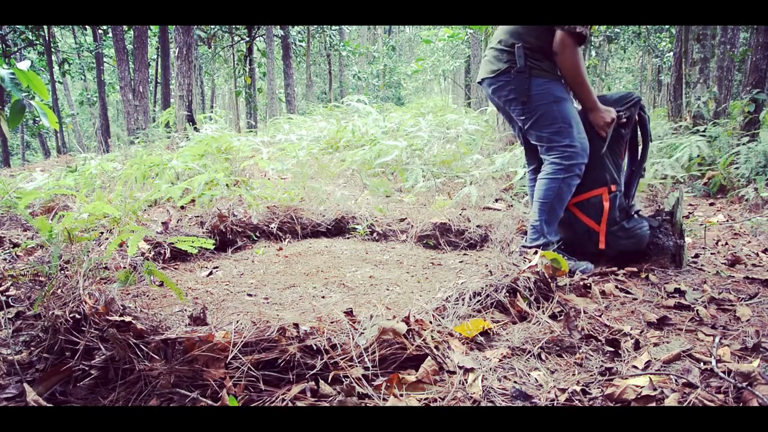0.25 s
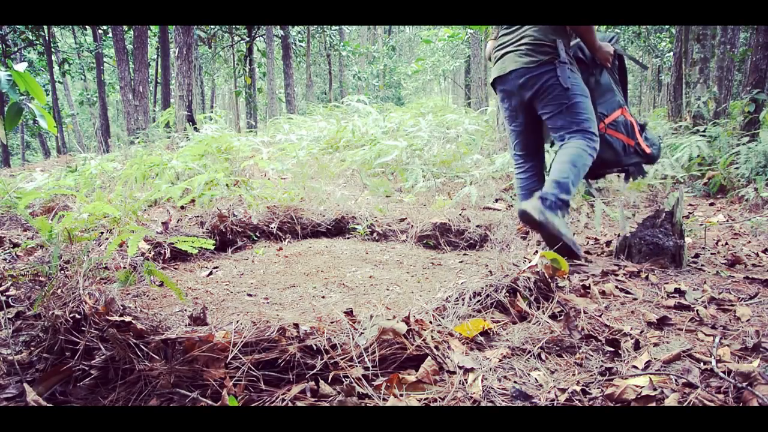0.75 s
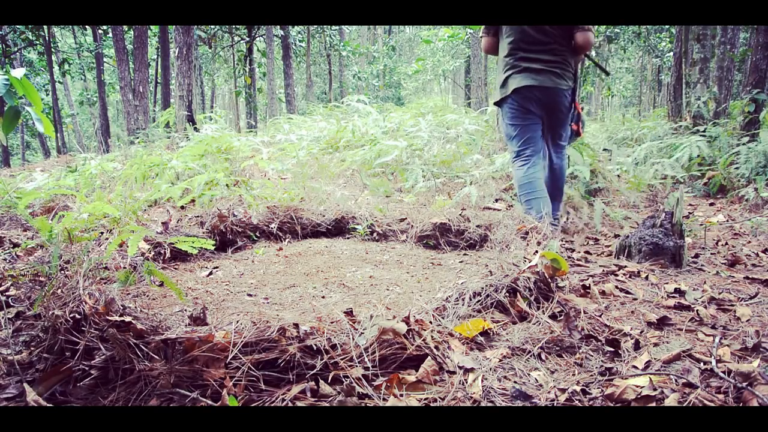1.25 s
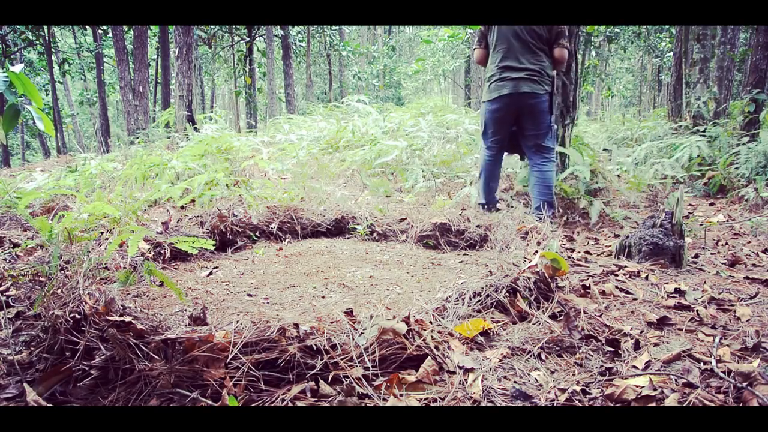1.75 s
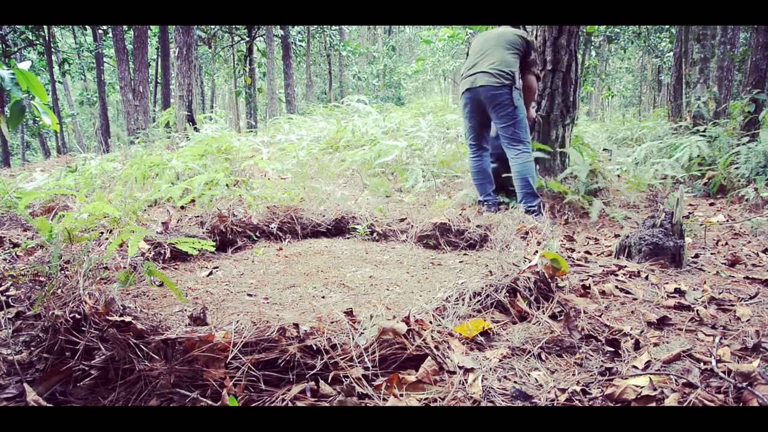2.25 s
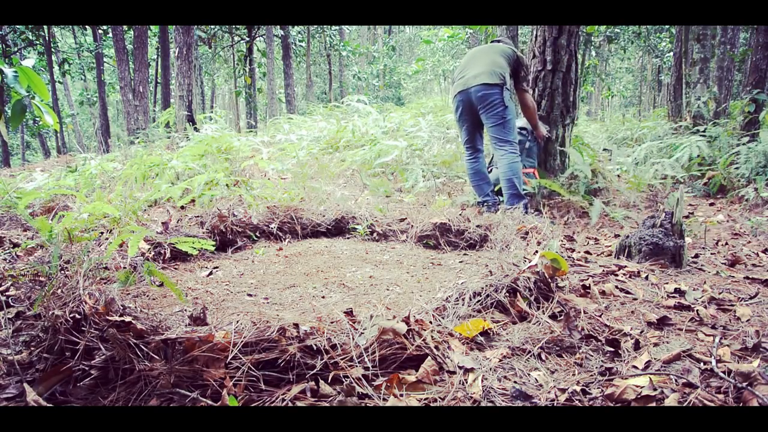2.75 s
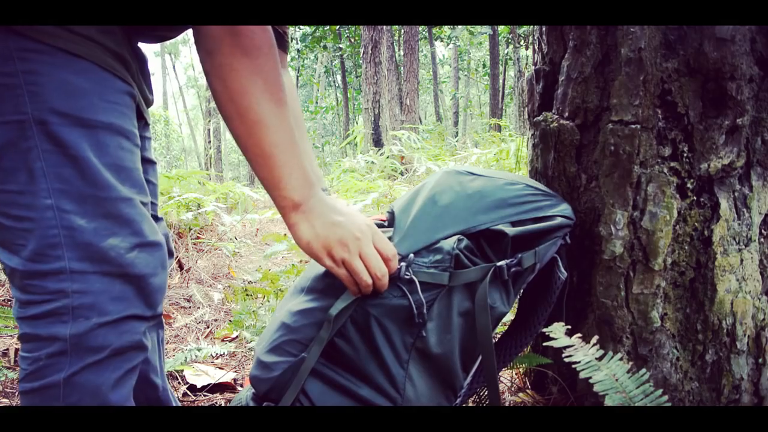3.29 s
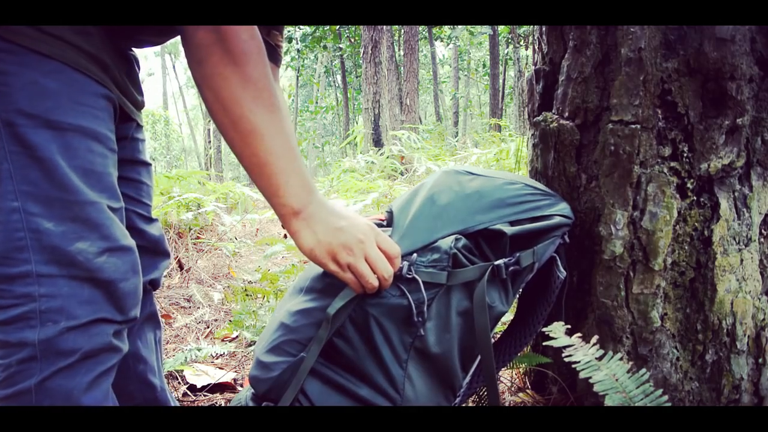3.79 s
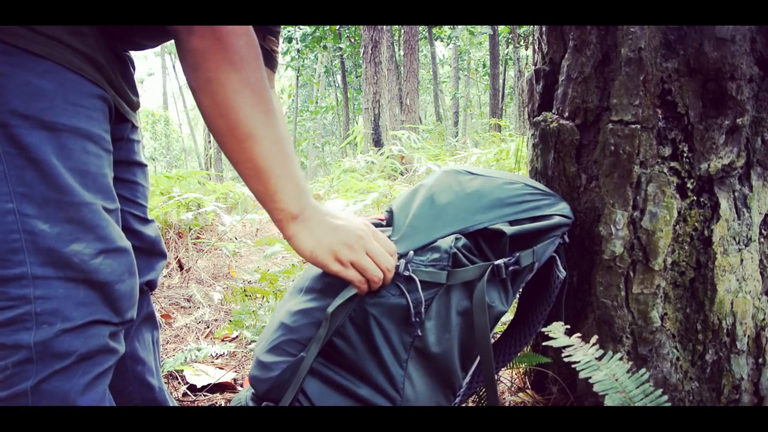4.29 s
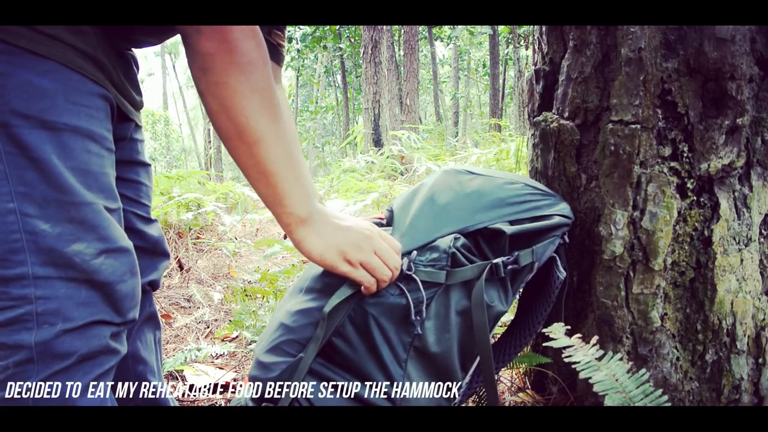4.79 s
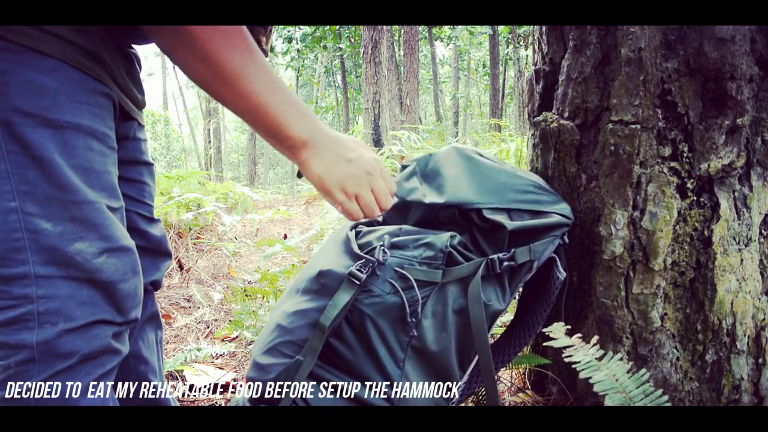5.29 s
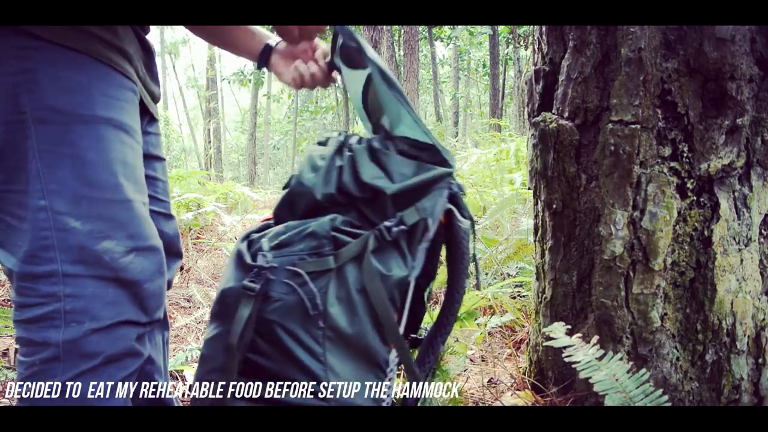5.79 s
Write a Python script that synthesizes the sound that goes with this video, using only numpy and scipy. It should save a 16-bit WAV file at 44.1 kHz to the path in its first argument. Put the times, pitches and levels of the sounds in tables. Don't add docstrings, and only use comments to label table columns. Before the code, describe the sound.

Outdoor stereo pickup among trees: a continuous high cicada hiss with needle-thin insect tones, one growing strong in the second half and leaning left. Light scuffs and crackling leaf litter come first, with a faint bee hum. After a pause, a small strap tick, a crisp buckle click, then quick tugs, creases and a dull flap of a nylon backpack lid, heard close and dry.

```python
import sys
import numpy as np
from scipy import signal
from scipy.fft import rfft, irfft
from scipy.io import wavfile

SR = 44100
rng = np.random.default_rng(int(sys.argv[2]) if len(sys.argv) > 2 else 0)


def generate_wav(sig):
    pcm = np.round(np.clip(np.atleast_2d(sig).T, -1, 1) * 32767).astype(np.int16)
    wavfile.write(sys.argv[1], SR, pcm)


def convert_level_to_amplitude(level_db):
    exponent = np.asarray(level_db, float) / 20
    return 10 ** exponent


N = 266352

# peak_s, length_s, level_db, weight_db, brightness_db
BOOT_STROKES = [(.2, 0.34, -50.5, -5, -3), (.295, 0.16, -42, -5, -9), (.382, 0.028, -45, -14, -6),
                (.64, 0.11, -47.5, -9, -3.5), (.89, 0.16, -51, -11, -14), (1.18, 0.062, -48, 1.5, 0),
                (1.26, 0.084, -43, -2.5, 2.5), (1.35, 0.12, -45, -5, -8), (1.215, .05, -45.5, -5, 1),
                (1.395, 0.038, -42, -7.5, -1), (1.43, 0.043, -46.5, -3, -1.5),
                (1.53, 0.094, -47, -4.5, -1.5), (1.57, 0.045, -58.5, 10, -6), (1.63, 0.037, -45, -1, 5),
                (1.655, .04, -44.5, -3, 0), (.325, 0.029, -40.5, -6, -11), (2.2, .1, -65, .1, -8),
                (1.68, 0.063, -45.5, -6, 7.5), (1.715, 0.044, -37.5, -12.5, -0.5), (1.74, .03, -42, -7, -3),
                (1.9, 0.86, -53, -3.5, 1), (2.32, 0.11, -52, -2.5, 5.5), (2.55, .2, -57.5, 0, -1.5),
                (2.72, 0.35, -48.5, -3.5, 1.2), (2.92, 0.44, -47.5, -3.5, 1.5)]
# peak_s, length_s, level_db, weight_db, brightness_db
LID_PULLS = [
    (5.48, .11, -51.5, 0.5, 2),
    (5.56, 0.073, -45.5, -7, -2),
    (5.645, 0.043, -41.5, -8, -1),
    (5.77, 0.091, -43, -4, -3),
    (5.7, .05, -48.5, 0, -2),
    (5.86, 0.18, -47, 0.5, -0.5),
    (5.935, 0.028, -36.5, -8, 0),
    (5.99, 0.13, -45.5, -4, -2),
]
# start_s, end_s, level_db
SOFT_GROUND = [
    (0, .4, -55),
    (1.2, 2.9, -57.5),
    (5.6, 6.04, -55.5),
]
# start_s, peak_db, body_hz, t60_s, crack_db
KNOCKS = [(1.2616, -33, 524, 0.029, -40), (1.452, -35, 895, 0.0093, -38), (1.526, -34.5, 895, 0.0092, -37),
          (1.56, -31, 690, 0.03, -47), (1.57, -31.5, 920, 0.033, -44), (1.581, -32, 740, 0.037, -46),
          (1.593, -35, 600, 0.027, -44), (1.62, -33, 930, .015, -40), (1.63, -40, 990, .02, -28),
          (1.638, -30, 750, .025, -47), (1.646, -33, 1000, .02, -47), (1.587, -37, 950, .025, -47),
          (1.662, -37, 1000, .02, -43), (.233, -33, 650, 0.018, -50), (0.328, -34, 557, .02, -50),
          (5.7932, -23, 1930, 0.0099, -44), (5.7938, -31, 620, 0.011, -50), (5.904, -37, 350, 0.035, -50),
          (5.814, -30.5, 900, 0.0089, -41)]
# pitch_hz, level_db, t60_s
BUCKLE_MODES = [(270, -27, 0.029), (385, -25, .018), (520, -19, 0.015), (736, -21, 0.012), (980, -25, 0.01),
                (2090, -22, 0.0057), (2900, -24, 0.0046), (3580, -18, 0.0072), (4500, -24, 0.004),
                (8460, -17, 0.0051)]
# pitch_hz, level_db, t60_s
STRAP_MODES = [(315, -25, .017), (480, -34, .012), (650, -22, .018), (1060, -40, 0.024)]
# pitch_hz, level_db, t60_s
LID_MODES = [(128, -31, .06), (235, -27, 0.036), (1000, -39, .015)]
# pitch_hz, level_db, t60_s
CORD_LOCK_MODES = [(620, -42, .015), (950, -29, .022), (2580, -29, 0.013)]
# start_s, peak_db, lowest_hz, highest_hz
SNAPS = [(1.2625, -27, 1500, 9000), (1.6215, -20, 3000, 9000), (1.7445, -19, 4500, 10000),
         (1.775, -33, 5000, 12000), (1.9203, -24.5, 2000, 11000), (2.698, -31, 1000, 3200),
         (2.7543, -25, 3500, 13000), (2.761, -26, 3000, 12000), (2.905, -34, 2500, 6000),
         (3.0292, -36, 1500, 4000), (5.22, -33, 3000, 9000), (5.4582, -25, 6000, 11500),
         (5.5555, -33, 3800, 6000), (5.5668, -23, 1000, 4500), (5.7932, -19, 696, 2800),
         (5.6535, -26, 1500, 3200), (5.814, -28, 600, 3000), (5.925, -34, 1500, 5000),
         (5.935, -24, 3200, 7000), (5.945, -30, 1200, 5000), (5.645, -27, 1500, 4500),
         (5.76, -28, 1500, 4000), (.32, -28, 3000, 5000), (.33, -25, 3000, 4760), (1.678, -28, 7000, 13000),
         (1.719, -24, 3000, 8000), (1.728, -26, 3500, 5500), (1.4, -26, 2000, 9000)]
# time_s, left_db, right_db, path_difference_cycles
NEAR_LEVELS = [
    [(0, -37, -37, 0.27), (.08, -33, -42, .9), (.104, -46, -48, .7), (.16, -43, -40, -0.00032),
     (.296, -44, -50, -0.61)],
    [(1.4, -43, -51, 0.15), (1.432, -33.5, -41, 0.16), (1.62, -36, -28.5, 0.22), (1.712, -28.5, -36, 0.22),
     (1.93, -34, -40, 0.35), (2.1, -33, -45, -0.99), (2.344, -31, -36, -0.34), (2.49, -32, -32, -1.15),
     (2.552, -52, -48, -1.1)],
    [(3.93, -46, -60, 1.1), (3.98, -32.5, -35, 0.28), (4.08, -23.5, -27, 1.4), (4.25, -24.5, -28.5, 0.093),
     (4.61, -26, -34.5, -0.44), (5.1, -19, -30, -0.26), (5.32, -22.5, -33.5, -0.73),
     (5.52, -23, -28.5, -0.59), (6.04, -22, -31.5, -0.33)],
]
NEAR_STROKES = [324, 326, 348]
# start_s, pitch_hz, climb_hz
NEAR_NOTES = [
    (-.62, 12076, 80),
    (1.4, 12057, 82),
    (3.93, 12020, 121),
]
STROKE_CLUSTERS = [-53, -52, -49.5]
# time_s, half_width_s, left_loss_db, right_loss_db
ECHO_DIPS = [(1.544, 0.054, 18, 11), (1.832, 0.092, 17, -2), (1.992, 0.12, 22, 13), (2.152, 0.044, 17, 9),
             (2.256, 0.052, 4, -2), (2.448, 0.053, 12, 6), (4.042, 0.019, 19, -1), (4.085, 0.091, -1, 19),
             (4.18, 0.071, 8, 0.5), (4.284, 0.033, 19, 1), (4.498, 0.095, 6, -4.5), (4.61, 0.046, -1.5, 6),
             (4.69, 0.084, 6, -2), (4.754, .03, 12, 6), (4.778, 0.069, 0.5, 1), (4.842, 0.059, 11.5, -2),
             (4.922, 0.093, 5, 4), (5.002, 0.057, 11, -3), (5.05, 0.095, 3, 7), (5.394, 0.078, 9, -3),
             (5.64, 0.042, 9, 1), (5.682, 0.062, -3.5, 2), (4.318, .03, 5, 3), (4.14, .025, 3, 2),
             (4.375, 0.021, 4, 9), (4.565, 0.032, 1, 2.5), (4.65, 0.026, 6, -1), (5.25, 0.073, 5.5, 6),
             (5.49, 0.019, 5, 3), (5.75, 0.13, 4, 6), (5.86, 0.027, 4, 0), (5.93, 0.043, 5, 3)]
# start_s, end_s, level_db
FIRST_SPELLS = [(0, .04, -56), (.07, .1, -52), (.15, .2, -55), (1.4, 1.5, -48), (1.55, 1.62, -50),
                (1.72, 1.76, -53), (1.83, 1.92, -48.5), (1.95, 2.03, -52), (2.2, 2.3, -50.5),
                (2.4, 2.49, -48), (3.97, 4.3, -45), (4.3, 4.5, -48), (4.5, 4.63, -51), (5.02, 5.2, -57),
                (5.24, 5.28, -54), (5.3, 5.47, -48), (5.5, 5.6, -44.5), (5.62, 6.04, -46.5)]
# start_s, end_s, level_db
SECOND_SPELLS = [(0, .03, -48), (1.6, 1.72, -48), (4.4, 4.7, -55), (4.9, 6.04, -48)]
# start_s, end_s, level_db
THIRD_SPELLS = [(0, .17, -48), (1.88, 1.95, -50.5), (2.0, 2.12, -56), (2.2, 2.53, -47), (3.97, 4.05, -52),
                (4.15, 4.26, -54), (4.33, 4.5, -50.5), (4.55, 4.75, -54), (4.85, 5.12, -56.5),
                (5.2, 5.42, -57)]
# start_s, end_s, level_db
SIDEBAND_SPELLS = [(0, .2, -49), (1.5, 1.7, -52), (1.8, 1.95, -46), (2.05, 2.33, -44.5), (3.97, 4.03, -51),
                   (4.07, 4.13, -48), (4.19, 4.26, -45), (4.35, 4.53, -45), (4.58, 4.7, -51),
                   (4.75, 4.88, -52), (4.93, 5.02, -42), (5.05, 5.3, -46), (5.36, 5.43, -48),
                   (5.46, 5.49, -43), (5.66, 5.78, -49), (5.93, 6.0, -48)]
# start_db, middle_db, end_db, left_minus_right_db
FAR_LEVELS = [(-50, -45, -48, 3), (-48, -52, -52, 5), (-48.5, -50, -45, 1), (-54, -62, -63, 6),
              (-46, -46.5, -44, 2), (-47, -40, -60, -1), (-66, -53, -51, 6), (-50, -50.5, -51, 11),
              (-58, -67, -46, 3), (-54, -76, -56, 17), (-68, -49, -67, 9), (-53, -48, -56, 9)]
# start_s, end_s, first_hz, climb_hz, ease_s
FAR_NOTES = [(0, .68, 12441, 590, 5), (0, .74, 12276, 470, 5), (.66, 2.3, 13060, -215, .95),
             (.97, 1.17, 11775, 970, 5), (1.1, 2.94, 12325, 110, .6), (1.75, 2.29, 12337, 630, 5),
             (.7, 1.6, 12767, -810, 5), (2.97, 4.29, 12322, 172, 1), (2.97, 4.49, 12716, -515, 5),
             (3.1, 3.7, 12139, 715, 5), (2.97, 4.05, 12495, 175, 1), (2.42, 2.94, 12720, 300, 5)]
# time_s, crowd_db, nearest_db
CHORUS_LEVELS = [(0.0, -39.5, -49.5), (5.31, -39.5, -41.5), (6.04, -38, -58)]
# pitch_hz, width_hz, level_db
CICADA_BODY = [(7070, 330, -5), (7340, 550, 2), (14580, 1400, -7.5)]
# pitch_hz, level_db (per Hz)
AIR_COLOUR = [(15, -48), (25, -15), (75, 0.5), (392, -2.5), (798, -3.5), (854, -2.5), (2690, -8.5),
              (3090, -4.5), (3600, -8.5), (4350, -7), (6000, -11), (7800, -19), (13200, -120)]
# pitch_hz, level_db (per Hz)
AIR_TOP = [(9000, -10), (11500, -5), (13500, -4), (15900, -8.5)]
# time_s, level_db
AIR_LEVEL = [(0.0, -47.5), (2.84, -50.5), (2.96, -49.5), (5.23, -49), (6.04, -49.5)]
# pitch_hz, likeness (1 = same)
LIKENESS = [(25, .7), (60, 0.88), (200, 0.57), (500, 0.41), (1200, 0.33), (2500, 0.39), (5000, 0.052),
            (12000, -0.11)]

BUCKLE_S, STRAP_S, LID_FLOP_S, CORD_LOCK_S = 4.6678, 4.3341, 5.5677, 5.6528
STROKE_RISE_DB, STROKE_FALL_DB = 13.5, 10.5
BOOT_STROKES_END_S = 2.95
SNAP_T60_S = 0.0079
NEAR_EASE_S = .28
HAZE_HZ, HAZE_BELOW_DB = 330, 23
GHOST_HZ = 48000 - 44100
SPELL_FADE_DB_PER_S = 120
LEAF_FLICKER_DB, LEAF_FLICKER_HZ = 1.5, 5
GROUP_S, LAST_PULSE_S = .0499, 3.269
CUTOFF_HZ, WHINE_HZ = 15770, 15735


def scuffs():
    crunch = litter(3000, 2.66, 373, 1620, count=5)
    rustle = litter(7000, 2.6, 2500, 5200, count=4)
    hiss = litter(11000, 2.4, 7300, 13700, count=4)
    walking = sounding([(0,), (BOOT_STROKES_END_S,)], fade=0.0033)
    low, mid, high = strokes(BOOT_STROKES) * walking + strokes(LID_PULLS)
    thud = convert_level_to_amplitude(spells(SOFT_GROUND)) * litter(600, 1.8, 65, 244, count=3)
    return thud + convert_level_to_amplitude(2.0) * low * crunch + convert_level_to_amplitude(2.5) * mid * rustle + convert_level_to_amplitude(6.5) * high * hiss


def litter(per_s, scatter_db, low_hz, high_hz, count):
    sizes = convert_level_to_amplitude(scatter_db * np.minimum(rng.exponential(1, N), 5)) * rng.choice([-1, 1], N)
    clicks = sizes * (rng.random(N) < per_s * convert_level_to_amplitude(1.5 * drift(45)) / SR)
    pair = clicks * np.array([np.ones(N), rng.standard_normal(N)])
    dealt, out = rng.integers(0, count, N), 0
    for k, hz in enumerate(np.geomspace(low_hz, high_hz, count)):
        mid, side = resonate(pair * (dealt == k) + 1e-18, hz, hz / 1.98)
        out = out + spread(mid, side, hz) * convert_level_to_amplitude(1.37 * drift(12.6)) / np.sqrt(hz) ** 0.25
    return out / np.sqrt(np.mean(out.mean(0) ** 2))


def strokes(rows):
    t = np.arange(0, N + 64, 64) / SR
    s, length, db, weight_db, bright_db = np.transpose(rows)[:, :, None]
    slope_db = np.where(t < s, STROKE_RISE_DB, STROKE_FALL_DB)
    level = db - slope_db * np.abs(t - s) / length
    gains = []
    for more_db in (weight_db, 0, bright_db):
        gain = np.sqrt(np.sum(convert_level_to_amplitude(level + more_db) ** 2, axis=0))
        gains.append(np.interp(np.arange(N) / SR, t, gain))
    return gains


def knocks():
    noise = rng.standard_normal((len(KNOCKS) + 4, 2, 3000))
    out = -blow(BUCKLE_S, BUCKLE_MODES, -19, noise[-1], rise_cycles=0.32)
    out += blow(STRAP_S, STRAP_MODES, -36, noise[-2], rise_cycles=.55)
    out += blow(LID_FLOP_S, LID_MODES, -45, noise[-3])
    out += blow(CORD_LOCK_S, CORD_LOCK_MODES, -40, noise[-4])
    for (s, db, hz, t60, crack_db), hiss in zip(KNOCKS, noise):
        modes = [(0.746 * hz, db - 6, t60), (hz, db - 0.5, t60), (1.49 * hz, db - 6, 0.92 * t60)]
        out += blow(s, modes, crack_db, hiss)
    return out


def blow(s, modes, crack_db, noise, rise_cycles=0.12):
    out, t, i = np.zeros((2, N + 3000)), np.arange(3000) / SR, round(s * SR)
    body = np.zeros(len(t))
    for hz, db, t60 in modes:
        swell = 1 - np.exp(-t * hz / rise_cycles)
        body += convert_level_to_amplitude(db - 60 * t / t60) * swell * np.sin(2 * np.pi * hz * t)
    crack = spread(*band(noise, 860, 16000), 1500) * convert_level_to_amplitude(crack_db - 60 * t / 0.014)
    out[:, i:i + len(t)] = band(body, 95, 8800) + crack
    return out[:, :N]


def snaps():
    out, t = np.zeros((2, N + 1000)), np.arange(1000) / SR
    for (s, db, low_hz, high_hz), noise in zip(SNAPS, rng.standard_normal((len(SNAPS), 2, 1000))):
        burst = band(spread(*noise, 500) * convert_level_to_amplitude(-60 * t / SNAP_T60_S), low_hz, high_hz)
        i = round(s * SR)
        out[:, i:i + len(t)] += convert_level_to_amplitude(db) * burst / np.abs(burst.mean(0)).max()
    return out[:, :N]


def near_whistler(rows, note, strokes_per_s, cluster_db):
    left_db, right_db, lag = in_time(rows)
    levels_db = np.array([left_db, right_db])
    blur = rms_one(band(rng.standard_normal((2, N)), 30, HAZE_HZ))
    haze = blur * convert_level_to_amplitude(levels_db - HAZE_BELOW_DB)
    left_db, right_db = levels_db - fades()
    db, pan_db = (left_db + right_db) / 2, left_db - right_db
    turns, t = np.cumsum(climb(*note, NEAR_EASE_S)) / SR, np.arange(N) / SR
    gate = sounding(rows, fade=0.023)
    onset = sounding(rows, fade=.1) * gate
    third_db = spells(THIRD_SPELLS)
    pulses = turns * strokes_per_s / 12190
    out = line(turns, db, pan_db, lag, gate) + haze * line(turns, 0, 0, 0, gate)
    out += line(turns / 4, spells(FIRST_SPELLS) + .7 * drift(9), 0, .1, gate)
    out += line(turns / 2, spells(SECOND_SPELLS), 1.6, 0.33, gate)
    out += line(turns * 3 / 4, third_db + 1.5 * drift(12), 4, .15, gate)
    out += line(turns * 3 / 4 - pulses, third_db - 6, 4, 0.16, gate)
    out += line(turns - pulses, spells(SIDEBAND_SPELLS) + 1.2 * drift(12), 7, 0.17, gate)
    for step, more_db in zip([1, .5, -.5], [1.5, .1, -8]):
        out += line(turns + step * pulses, cluster_db + more_db + 2.5 * drift(7), 3.5, 0.36, onset)
    out += line(turns - GHOST_HZ * t, db - 19, pan_db, lag, gate)
    return out + line(turns - 2 * GHOST_HZ * t, db - 33.5, pan_db, lag, gate)


def fades():
    t = np.arange(0, N + 64, 64) / SR
    s, width, *loss_db = np.transpose(ECHO_DIPS)[:, :, None]
    dips = np.maximum(1 - np.abs(t - s) / width, 0)
    return [np.interp(np.arange(N) / SR, t, np.sum(db * dips, axis=0)) for db in loss_db]


def far_whistler(levels, note):
    start, end, *pitch = note
    *swell_db, pan_db = levels
    rows = list(zip([start, (start + end) / 2, end], swell_db))
    turns = np.cumsum(climb(start, *pitch) + 4 * drift(12)) / SR
    gate = sounding(rows, fade=.06)
    db = in_time(rows)[0] + LEAF_FLICKER_DB * drift(LEAF_FLICKER_HZ)
    wander_db = pan_db + 2 * LEAF_FLICKER_DB * drift(LEAF_FLICKER_HZ)
    out = line(turns, db + 2.5 * drift(36), wander_db, 0.093 + 0.39 * drift(6.0), gate)
    out += line(turns / 2, db - 17.5, 0, 0.075, gate)
    return out + line(turns / 4, db - 14.0, 2, 0.23, gate)


def climb(start, hz, climb_hz, ease):
    return hz + climb_hz * np.log(1 + np.maximum(np.arange(N) / SR - start, 0) / ease)


def chorus():
    crowd_db, near_db = in_time(CHORUS_LEVELS)
    crowd = rng.standard_normal((2, N)) * convert_level_to_amplitude(1.0 * drift(45) + 0.12 * drift(2.4))
    group = 2 * np.pi * (np.arange(N) / SR - LAST_PULSE_S) / GROUP_S + .12 * drift(2)
    pulse_db = 9 * np.cos(4 * group) + 7 * np.cos(group + 1.3) - 3 * np.cos(2 * group + 3)
    buzz = rng.standard_normal((2, N)) * convert_level_to_amplitude(pulse_db + 1.5 * drift(30))
    far = convert_level_to_amplitude(crowd_db) * tymbals(crowd, octave_db=-1.5)
    return far + convert_level_to_amplitude(near_db) * tymbals(buzz, octave_db=2.5)


def tymbals(clicks, octave_db):
    rung = 0
    for (hz, width_hz, db), more_db in zip(CICADA_BODY, [0, 0, octave_db]):
        width_hz = 1.34 * width_hz
        rung = rung + convert_level_to_amplitude(db + more_db) * resonate(resonate(clicks, hz, width_hz), hz, width_hz)
    return convert_level_to_amplitude(np.array([[1.2], [-1.2]])) * rms_one(spread(*rung, 8300))


def bee():
    hum = resonate(resonate(rng.standard_normal(N), 446, 20), 446, 20)
    return convert_level_to_amplitude(spells([(.42, 1.3, -63), (1.45, 2.3, -67)])) * rms_one(hum)


def air():
    hz = np.maximum(np.fft.rfftfreq(N, 1 / SR), 1)
    mid, side = rfft(rng.standard_normal((2, N)))
    colour = convert_level_to_amplitude(at_hz(list(AIR_COLOUR)[:-1] + list(AIR_TOP), hz))
    both = irfft(spread(mid, side, hz) * colour, N)
    return convert_level_to_amplitude(in_time(AIR_LEVEL)[0] + 5 + 0.5 * drift(5.3)) * rms_one(both)


def electronics_whine():
    return line(np.arange(N) * WHINE_HZ / SR, -68 + 4.0 * drift(6), 4, .1)


def line(turns, db, pan_db, lag, gate=1):
    out, on = np.zeros((2, N)), np.broadcast_to(gate, N) > 0
    turns, db, pan_db, lag, gate = [np.broadcast_to(v, N)[on] for v in (turns, db, pan_db, lag, gate)]
    out[0, on] = gate * convert_level_to_amplitude(db + pan_db / 2) * np.cos(2 * np.pi * turns)
    out[1, on] = gate * convert_level_to_amplitude(db - pan_db / 2) * np.cos(2 * np.pi * (turns - lag))
    return np.sqrt(2) * out


def spells(rows):
    t = np.arange(0, N + 64, 64) / SR
    start, end, db = np.transpose(rows)[:, :, None]
    away_s = np.maximum(np.maximum(start - t, t - end), 0)
    level = np.max(db - SPELL_FADE_DB_PER_S * away_s, axis=0)
    return np.interp(np.arange(N) / SR, t, level)


def in_time(rows):
    s, *columns = np.transpose(rows)
    return [np.interp(np.arange(N) / SR, s, c) for c in columns]


def sounding(rows, fade):
    t = np.arange(N) / SR
    return np.clip(np.minimum(t - rows[0][0] + fade, rows[-1][0] + fade - t) / fade, 0, 1)


def drift(rate):
    r = np.exp(-80 * np.pi * rate / SR)
    slow = signal.lfilter([1], [1, -2 * r, r * r], rng.standard_normal(N // 40 + 2002))[2000:]
    return np.interp(np.arange(N) / 40, np.arange(len(slow)), rms_one(slow))


def spread(mid, side, hz):
    alike = np.clip(at_hz(LIKENESS, hz), -1, 1)
    return np.sqrt(1 + alike) * mid + np.sqrt(1 - alike) * side * np.array([[1], [-1]])


def at_hz(points, hz):
    points = np.array(points)
    return np.interp(np.log(hz), np.log(points[:, 0]), points[:, 1])


def rms_one(x):
    return x / np.sqrt(np.mean(x ** 2) + 1e-20)


def resonate(x, hz, width_hz):
    r = np.exp(-np.pi * width_hz / SR)
    poles = [1, -2 * r * np.cos(2 * np.pi * hz / SR), r * r]
    return signal.lfilter([(1 - r * r) / 2, 0, (r * r - 1) / 2], poles, x)


def band(x, low_hz, high_hz):
    edges_hz = [low_hz, min(high_hz, .45 * SR)]
    return signal.sosfilt(signal.butter(2, edges_hz, "band", fs=SR, output="sos"), x)


def scene():
    hiker = scuffs() + knocks() + snaps()
    near = sum(map(near_whistler, NEAR_LEVELS, NEAR_NOTES, NEAR_STROKES, STROKE_CLUSTERS))
    far = sum(map(far_whistler, FAR_LEVELS, FAR_NOTES))
    return hiker + near + far + chorus() + bee() + air() + electronics_whine()


def roll_off(x):
    return signal.sosfilt(signal.butter(12, 15920, fs=SR, output="sos"), x)


def record(dry):
    low_pass = signal.ellip(12, .3, 45, CUTOFF_HZ, fs=SR, output="sos")
    mix = signal.sosfilt(low_pass, dry) * convert_level_to_amplitude(np.array([[.4], [-.4]]))
    return roll_off(mix)


dry = scene()
out = record(dry)
generate_wav(out)
```